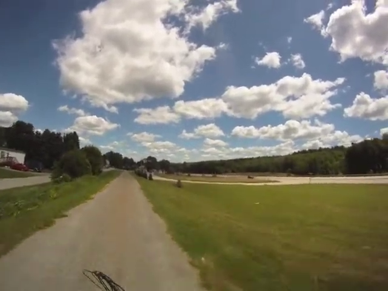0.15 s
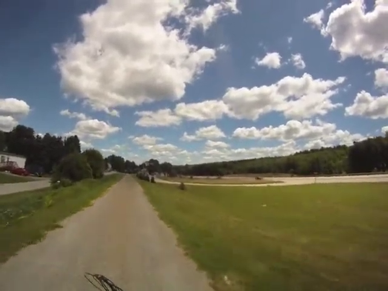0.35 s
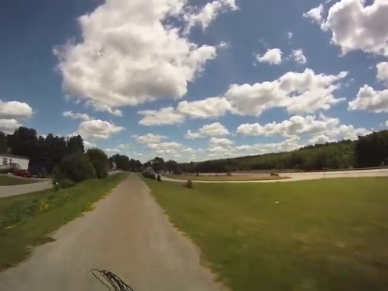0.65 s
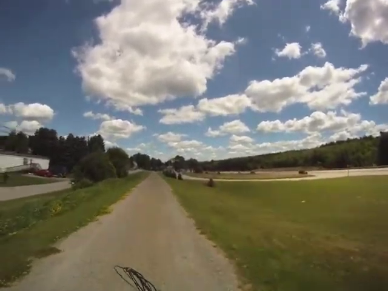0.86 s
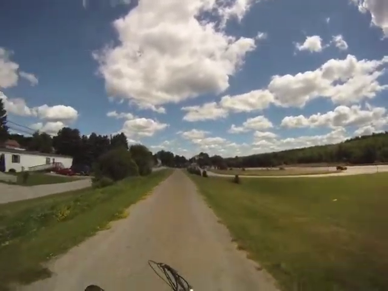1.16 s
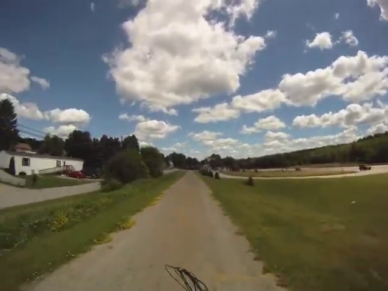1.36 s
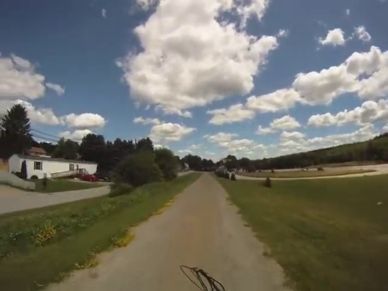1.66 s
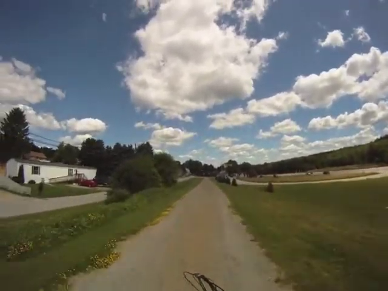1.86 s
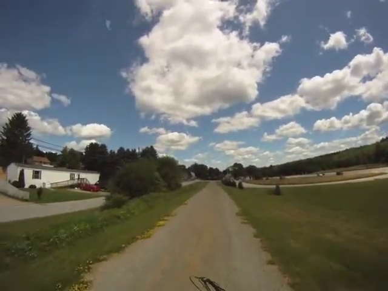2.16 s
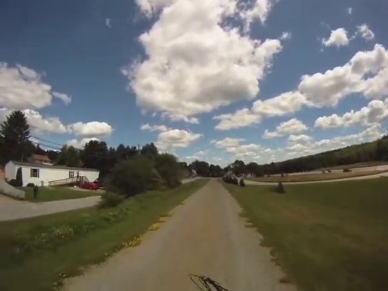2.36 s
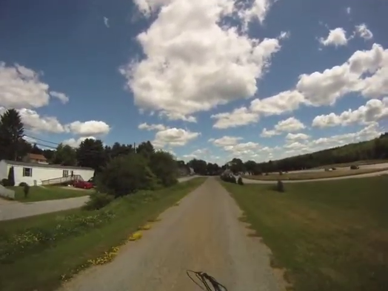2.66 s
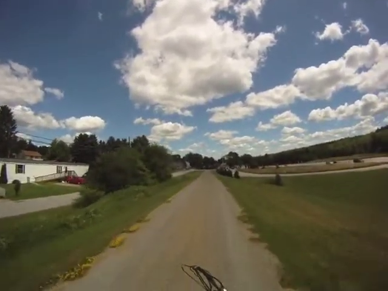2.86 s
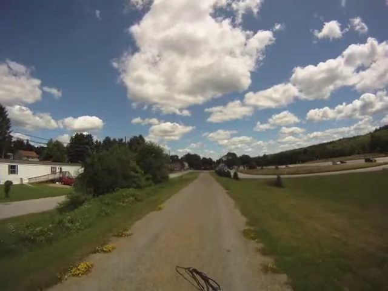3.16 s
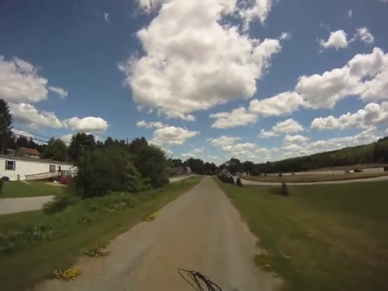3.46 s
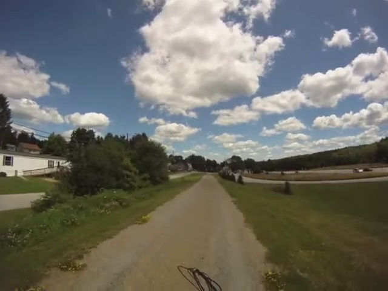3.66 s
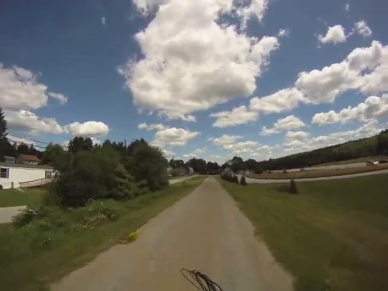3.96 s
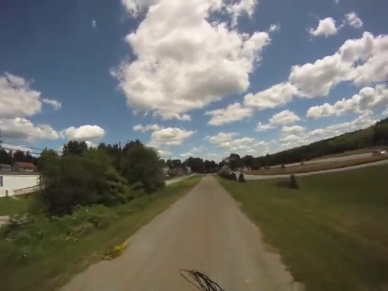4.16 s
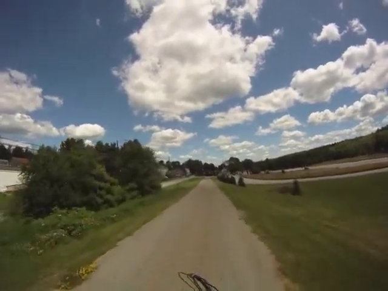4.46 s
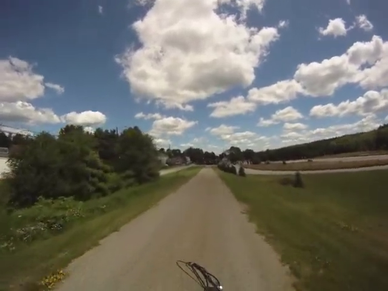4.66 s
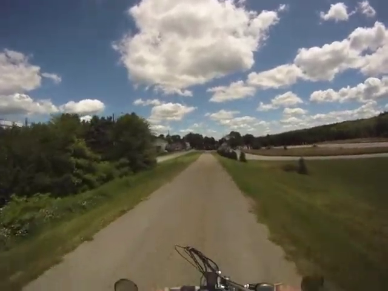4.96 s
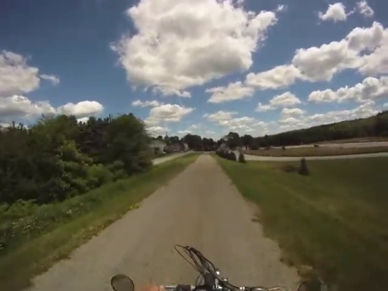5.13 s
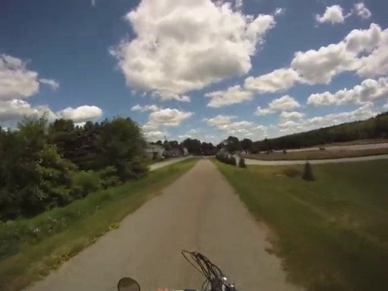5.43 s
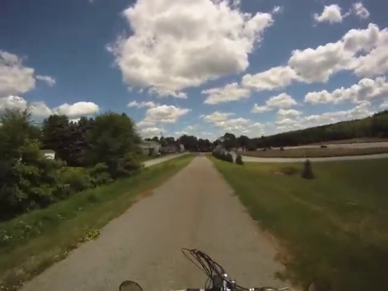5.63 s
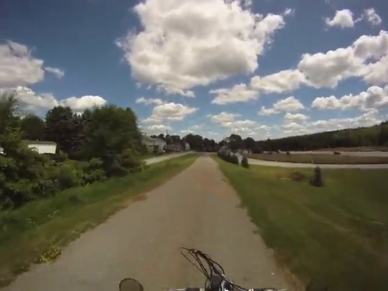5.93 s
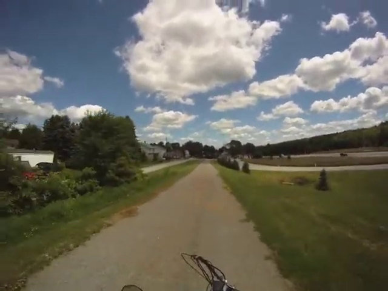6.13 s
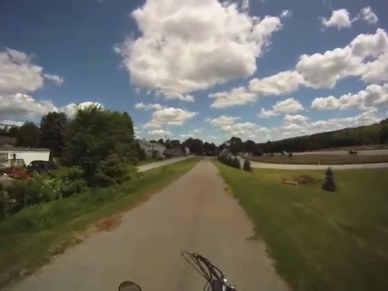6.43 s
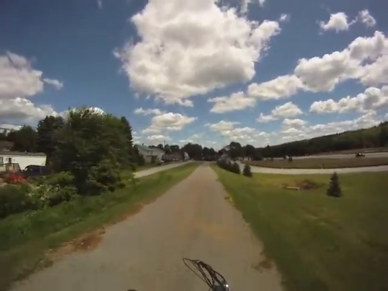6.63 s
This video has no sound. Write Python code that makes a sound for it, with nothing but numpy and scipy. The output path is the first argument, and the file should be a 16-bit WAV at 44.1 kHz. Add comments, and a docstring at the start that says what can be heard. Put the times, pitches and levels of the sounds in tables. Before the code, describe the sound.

Wind rushes and tyres rumble on a gravel trail while a motorised bike's muffled engine grows louder, heard from on board.

```python
"""A motorised bike rolls along a gravel trail, heard from on board. At first wind rumbles over a quiet
engine, and the tyres hiss and flick stones at the frame. Near 2 s comes a short run of light ticks.
From about 2.3 s the tyres drum and roar over stretches of coarse gravel. The engine takes load: its low
drone swells until about 6 s and sags in pitch, while the rush of air grows. All along, the recorder
holds each sample at a low rate, which mirrors the sound into a thin fizz in the treble."""
import sys
import numpy as np
from scipy import signal
from scipy.fft import rfft, irfft, next_fast_len
from scipy.io import wavfile

SR = 44100
rng = np.random.default_rng(int(sys.argv[2]) if len(sys.argv) > 2 else 0)


def master(y):
    """Save y as 16-bit WAV."""
    cut = np.clip(np.atleast_2d(y).T, -1, 1)
    pcm = np.round(cut * 32767)  # scale
    wavfile.write(sys.argv[1], SR, pcm.astype(np.int16))


N = 299439


# Engine speed. Each row: time in seconds, firings per second.
FIRING_RATE = [(0.0, 45.0), (3.6, 43.7), (4.45, 43.1), (5.0, 42.5), (5.7, 41.4), (5.83, 42.3), (6.2, 41.7),
               (6.55, 40.7), (6.79, 40.6)]
# The drone swells as the engine takes load. Each row: time in seconds, level in dB.
ENGINE_LOAD = [(0, -53), (0.17, -50.5), (0.4, -54.5), (1.55, -50), (2.6, -47), (2.88, -48), (3.1, -45),
               (4.05, -41.5), (4.45, -40), (5.4, -36), (5.9, -34), (6.55, -35.5), (6.79, -36.5)]
# The drone's tones. Each row: multiple of the firing rate, dB above FULL_LOAD_DB, dB gained per dB of load.
ENGINE_TONES = [(1, -28, -0.5), (2, -2.5, 1.14), (3, 0.3, 1.02), (5, -21, 1.1), (6, -36, 0),
                (7, -26.5, .95)]
# The fourth tone booms, then drops out as the engine picks up. Each row: time in seconds, level in dB.
FOURTH_TONE_LEVEL = [(0, -74), (3.15, -58), (3.4, -51), (4.2, -48.5), (4.5, -42.5), (5.0, -38), (5.68, -43),
                     (5.98, -71), (6.45, -48.5), (6.79, -54)]
# Dull noise under the drone. Each row: pitch in Hz, relative level in dB.
BUFFET_SPECTRUM = [(40, -27), (70, 2), (110, 1.5), (150, -3), (210, -2), (270, -11), (400, -29.5)]
FULL_LOAD_DB, BUFFET_DB = -36.5, -45.5
SURGE_EVERY_S, SURGE_CREST_S, SURGE_DB = 0.473, 3.095, 2

def engine():
    """A muffled exhaust drones at multiples of the firing rate, over dull buffeting that grows with it."""
    firing_hz, = in_time(FIRING_RATE)
    surge = np.cos(2 * np.pi * (np.arange(N) / SR - SURGE_CREST_S) / SURGE_EVERY_S)
    load_db = in_time(ENGINE_LOAD)[0] - FULL_LOAD_DB
    load_db += SURGE_DB * surge * (1 - np.minimum(from_db(load_db), 1))   # steadier under load
    phase = 2 * np.pi * np.cumsum(firing_hz * (1 + 0.0032 * drift(7.7))) / SR
    tones = [(round(k), FULL_LOAD_DB + db + follows * load_db) for k, db, follows in ENGINE_TONES]
    tones.append((4, in_time(FOURTH_TONE_LEVEL)[0]))
    drone = 0
    for multiple, db in tones:
        waver = from_db(0.21 * drift(8))
        smear = 2 * np.pi * multiple ** 2 / 5   # the silencer delays each tone, smoothing the throb
        drone += np.sqrt(2) * from_db(db) * waver * np.sin(multiple * phase + smear)
    buffet = turbulence(BUFFET_SPECTRUM, flutter_db=2, flutter_hz=5.8)
    return drone + from_db(BUFFET_DB + 0.63 * load_db) * buffet


# The wind's low rumble, broad rush and thin hiss. Each row: pitch in Hz, relative level in dB.
RUMBLE_SPECTRUM = [(15, 4), (30, -7), (60, 0), (100, -4.5), (160, -6), (230, -17.5), (400, -31)]
RUSH_SPECTRUM = [(250, 5.5), (500, 3.5), (900, 3), (1200, 2), (1650, 3), (2000, -3), (2400, -5),
                 (2900, -1.5), (3400, -9.5), (4200, -21), (5000, -18), (5700, -31.5), (6500, -75)]
HISS_SPECTRUM = [(3000, 4.5), (3800, 9), (4900, -6), (6000, -10), (7200, 3)]
# How loud each of the three is. Each row: time in seconds, level in dB.
RUMBLE_LEVEL = [(0, -46), (0.9, -51), (1.75, -47.5), (2.15, -48.5), (2.4, -50), (4.4, -52), (5.4, -42),
                (5.9, -47), (6.2, -47), (6.79, -47.5)]
RUSH_LEVEL = [(0, -55.5), (0.9, -53.5), (2.9, -51.5), (3.25, -52), (3.9, -50), (4.4, -49.5), (5.0, -46),
              (5.8, -48), (6.15, -51.5), (6.4, -47), (6.62, -51.5), (6.79, -45)]
HISS_LEVEL = [(0, -88), (3.1, -72), (3.5, -66.5), (5.7, -67.5), (5.82, -61), (6.15, -66.5), (6.38, -61),
              (6.79, -62)]

def wind(air_db):
    """Swirls of air thump on the camera housing while the airstream rushes and hisses past."""
    rumble = from_db(in_time(RUMBLE_LEVEL)[0]) * turbulence(RUMBLE_SPECTRUM, flutter_db=2, flutter_hz=8.5)
    rush = from_db(air_db) * turbulence(RUSH_SPECTRUM, flutter_db=1, flutter_hz=25)
    hiss = from_db(in_time(HISS_LEVEL)[0]) * turbulence(HISS_SPECTRUM, flutter_db=0.5, flutter_hz=40)
    return rumble + rush + hiss


# The tyres' hollow drumming and the gravel's roar. Each row: pitch in Hz, relative level in dB.
DRUM_SPECTRUM = [(380, -20), (460, -5.5), (530, 0.5), (580, -4), (632, 2.5), (690, -15.5), (780, -13.5)]
ROAR_SPECTRUM = [(250, -1), (400, -14), (600, -2), (720, 3), (830, 2.5), (970, 2.5), (1120, -10.5),
                 (1600, -9.5), (2500, -23)]
# Coarse gravel. Each row: start in seconds, length in seconds, drum level in dB, roar level in dB.
COARSE_STRETCHES = [(2.33, 0.6, -54, -52), (3.427, 0.62, -50.5, -54.5), (4.494, 0.69, -53, -51),
                    (5.76, 0.25, -49.5, -52.5), (6.33, 0.13, -55.5, -51.5)]
ROLL_ON_S, ROLL_OFF_S = 0.13, 0.21
SMOOTH_TRAIL_DB, STRONG_AIR_DB = -57, -48.5

def tyres(air_db):
    """Countless small touches of gravel merge into a roar and set the hollow tyres drumming."""
    pace_db = 0.81 * (air_db - STRONG_AIR_DB)   # on smooth trail the tyres rise and fall with the air
    drum_gain = roar_gain = from_db(SMOOTH_TRAIL_DB + pace_db)
    for start, length, drum_db, roar_db in COARSE_STRETCHES:
        end = start + length
        on_coarse, = in_time([(start - ROLL_ON_S, 0), (start, 1), (end, 1), (end + ROLL_OFF_S, 0)])
        drum_gain = drum_gain + on_coarse * (from_db(drum_db) - drum_gain)
        roar_gain = roar_gain + on_coarse * (from_db(roar_db) - roar_gain)
    drum = drum_gain * colour(grains(per_s=4000, spread_db=2), DRUM_SPECTRUM)
    roar = roar_gain * colour(grains(per_s=5000, spread_db=2), ROAR_SPECTRUM)
    return (drum + roar) * from_db(0.1 * drift(21))


# The larger stones. Each row: time in seconds, relative strength in dB.
STONE_HITS = [(0.2794, -43.5), (0.393, -42), (0.6915, -29.5), (0.727, -43), (0.9144, -40.5), (1.4086, -45),
              (1.5023, -36), (1.5773, -40.5), (1.717, -44.5), (1.7755, -43.5), (2.0872, -42.5),
              (2.5336, -34.5), (2.9672, -42), (4.0021, -37), (6.346, -39.5)]
# One stone's quick bounces. Each row: seconds after the first touch, relative strength in dB.
STONE_BOUNCES = [(0, 2), (.0019, -19), (.0036, -7), (.0062, -8)]
# The frame's ringing. Each row: pitch in Hz, relative level in dB, seconds to fade by 60 dB.
FRAME_TONES = [(1650, -15, 0.011), (2094, -7.5, 0.012), (2410, 4, 0.0067), (2916, 2.5, 0.013),
               (3470, 1.5, 0.0046), (4450, -2, 0.003)]

def stones():
    """Flung stones, a few large and many tiny, tick on the frame and skitter briefly."""
    hits = strikes(STONE_HITS) + from_db(-82) * grains(per_s=130, spread_db=3.5)
    skitter = signal.fftconvolve(hits, strikes(STONE_BOUNCES)[:SR // 20])[:N]
    low_cut = signal.butter(2, 1400, "high", fs=SR, output="sos")   # the ticks carry nothing below about 1.4 kHz
    return from_db(-8) * signal.sosfilt(low_cut, struck(skitter, FRAME_TONES))


# Jolts from the trail. Each row: time in seconds, relative strength in dB.
BUMP_HITS = [(0.7276, -35), (0.7304, -50), (2.5103, -39)]
# The mount's ringing. Each row: pitch in Hz, relative level in dB, seconds to fade by 60 dB.
MOUNT_TONES = [(590, -3.5, 0.046), (1000, -21, .006), (1600, -25, .003)]

def bumps():
    """Bumps jolt the camera mount, which rings with a short knock."""
    return struck(strikes(BUMP_HITS), MOUNT_TONES)


# The louder snaps of grit. Each row: time in seconds, relative strength in dB.
GRIT_SNAPS = [(0.4723, -61), (3.1477, -56), (4.2971, -58)]

def grit():
    """Grit snaps under the tread, each snap a tiny high ping."""
    snaps = strikes(GRIT_SNAPS) + from_db(-106) * grains(per_s=39, spread_db=3.5)
    return from_db(9) * ring(snaps, hz=5170, fade_s=0.0078)


def freewheel(start_s=1.953, every_s=0.0533, count=7):
    """A run of light, even ticks, as from a freewheel; each rings briefly at one high pitch."""
    times = start_s + every_s * np.arange(count)
    levels_db = -65 + 1.5 * rng.standard_normal(count)
    return ring(strikes(np.transpose([times, levels_db])), hz=5550, fade_s=0.026)


def from_db(db):
    """Turn decibels into a gain to multiply by."""
    return 10 ** (np.asarray(db) / 20)


def rms_one(x):
    """Scale a signal so that its average power is 1."""
    return x / np.sqrt(np.mean(x ** 2) + 1e-20)


def in_time(rows):
    """Join rows of (seconds, values) with straight lines, giving one curve per value column."""
    times, *columns = np.transpose(rows)
    return [np.interp(np.arange(N) / SR, times, column) for column in columns]


def drift(hz):
    """A smooth random wander of about 1 either way; a higher hz makes it quicker."""
    stride, settle = 40, 2000
    pole = np.exp(-2 * np.pi * hz * stride / SR)
    noise = rng.standard_normal(N // stride + settle + 2)
    slow = signal.lfilter([1], [1, -2 * pole, pole * pole], noise)[settle:]
    return np.interp(np.arange(N) / stride, np.arange(len(slow)), rms_one(slow))


def colour(x, spectrum):
    """Shape x with a spectrum that falls 24 dB per octave beyond its ends; average power 1."""
    hz, db = np.transpose(spectrum)
    octave = np.log2(np.arange(N + 1) * SR / (2 * N) + 1e-3)
    beyond = np.abs(octave - np.clip(octave, np.log2(hz[0]), np.log2(hz[-1])))
    gain = from_db(np.interp(octave, np.log2(hz), db) - 24 * beyond)
    size = next_fast_len(N, True)
    gain = np.interp(np.linspace(0, 1, size // 2 + 1), np.linspace(0, 1, N + 1), gain)
    return rms_one(irfft(rfft(x, size) * gain, size)[:N])


def turbulence(spectrum, flutter_db, flutter_hz):
    """Shaped noise whose level flutters at random."""
    return colour(rng.standard_normal(N), spectrum) * from_db(flutter_db * drift(flutter_hz))


def grains(per_s, spread_db):
    """Random clicks, many small and a few large; average power 1."""
    sizes = from_db(spread_db * np.minimum(rng.exponential(1, N), 5))
    signs = rng.choice([-1, 1], N)
    return rms_one(sizes * signs * (rng.random(N) < per_s / SR))


def strikes(events):
    """One click for each row of (seconds, dB)."""
    times, db = np.transpose(events)
    clicks = np.zeros(N)
    clicks[np.round(times * SR).astype(int)] = from_db(db)
    return clicks


def ring(clicks, hz, fade_s):
    """Each click starts a pure tone that dies away by 60 dB in fade_s."""
    decay, turn = from_db(-60 / (fade_s * SR)), 2 * np.pi * hz / SR
    return signal.lfilter([0, np.sin(turn)], [1, -2 * decay * np.cos(turn), decay ** 2], clicks + 1e-18)


def struck(clicks, tones):
    """A blow rings all of a body's tones at once; a steep cut above about 4.4 kHz dulls the treble."""
    ringing = sum(from_db(db) * ring(clicks, hz, fade_s) for hz, db, fade_s in tones)
    return signal.sosfilt(signal.butter(6, 4400, fs=SR, output="sos"), ringing)


def scene():
    """Engine, wind and gravel as heard from the bike, in one channel."""
    air_db, = in_time(RUSH_LEVEL)
    return (engine() + wind(air_db) + tyres(air_db) + stones() + bumps() + grit() + freewheel())[None]


# The recorder's clock. Each row: time in seconds, samples per second.
CLOCK_RATE = [(0, 12000), (5.77, 12000), (5.78, 12375), (6.79, 12375)]

def sample_and_hold(x, oversample=8):
    """Each sample is held until the next clock tick; the steps mirror the sound around the clock rate."""
    fine = signal.resample_poly(x, oversample, 1)
    clock_hz = np.repeat(in_time(CLOCK_RATE)[0], oversample)
    tick_count = np.floor(np.cumsum(clock_hz) / (oversample * SR))
    is_tick = np.diff(tick_count, prepend=0) > 0
    last_tick = np.maximum.accumulate(np.arange(len(fine)) * is_tick)
    return signal.resample_poly(fine[last_tick], 1, oversample)


def record(dry):
    """The recorder turns the sound into steps, then steeply cuts the highest treble."""
    treble_cut = signal.ellip(14, 0.1, 90, 15270, fs=SR, output="sos")
    return signal.sosfilt(treble_cut, sample_and_hold(dry[0]))[None]


dry = scene()
out = record(dry)
master(out)
```